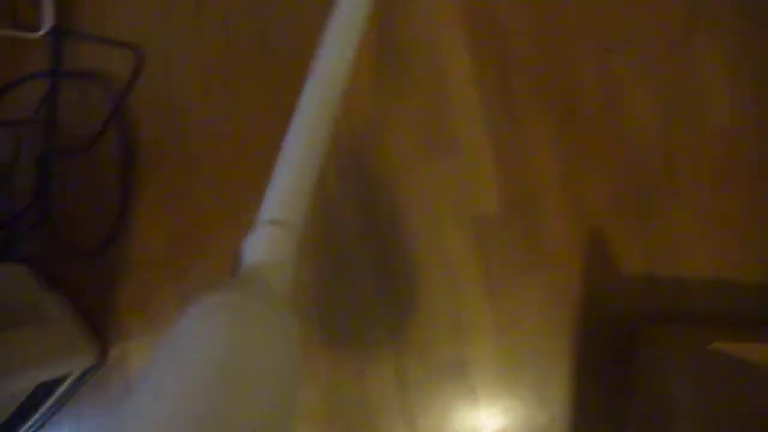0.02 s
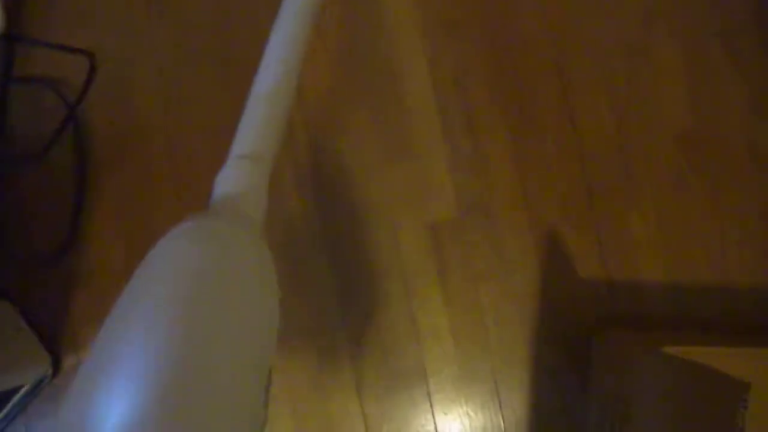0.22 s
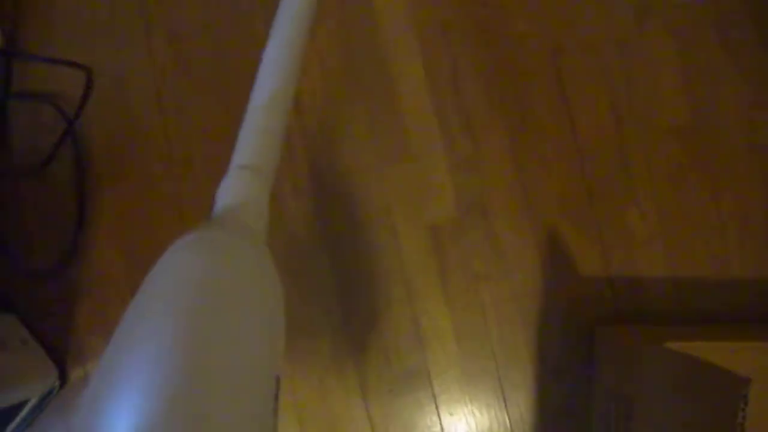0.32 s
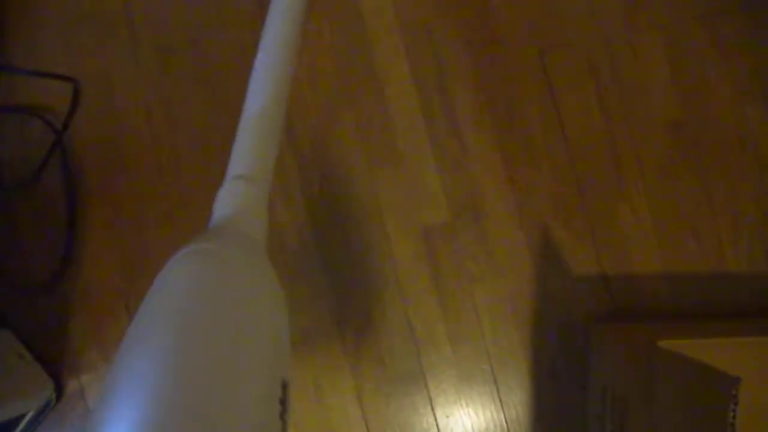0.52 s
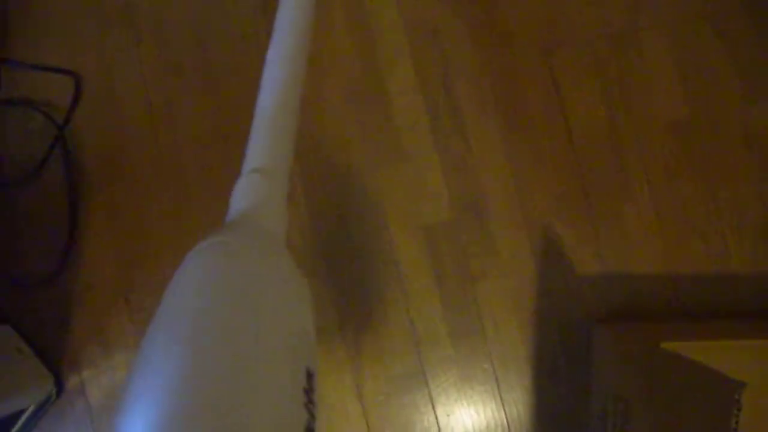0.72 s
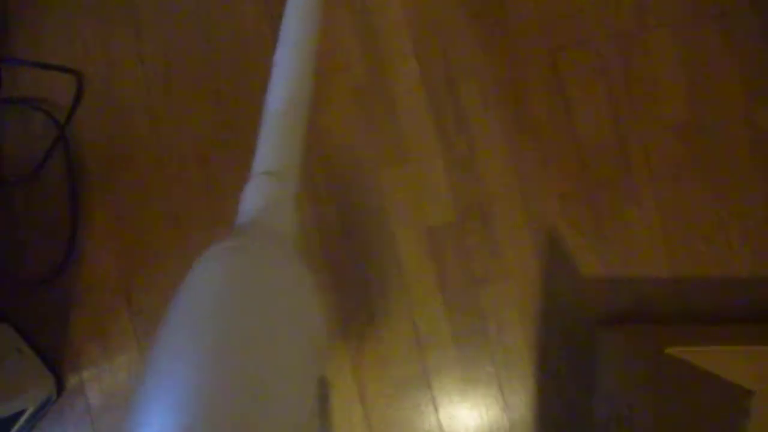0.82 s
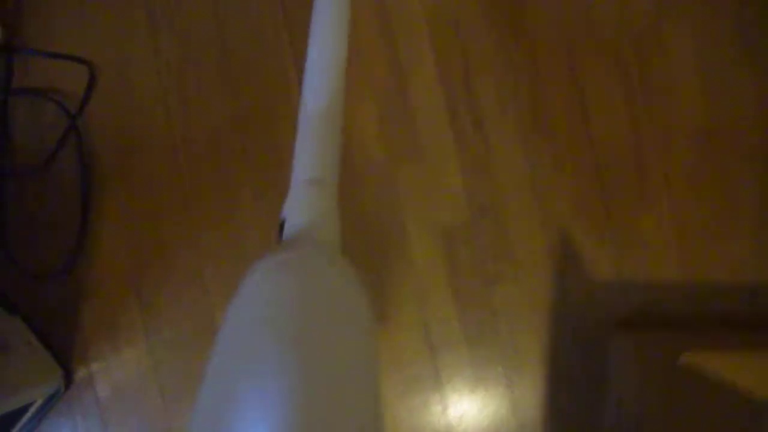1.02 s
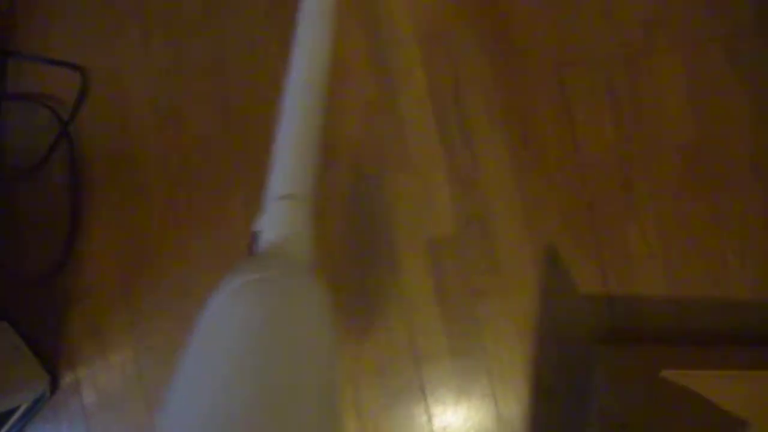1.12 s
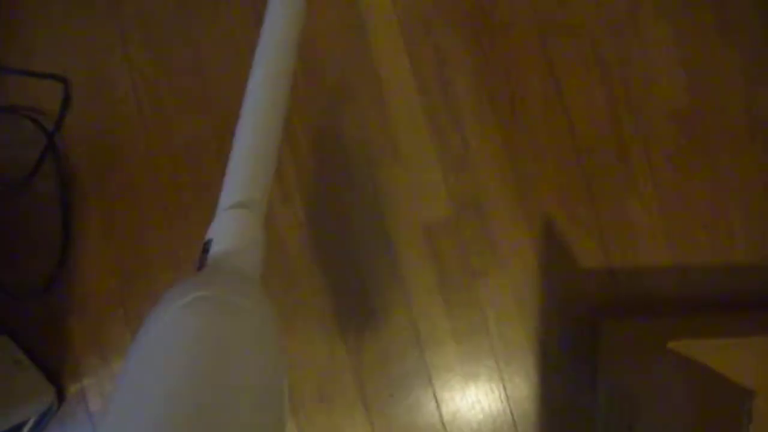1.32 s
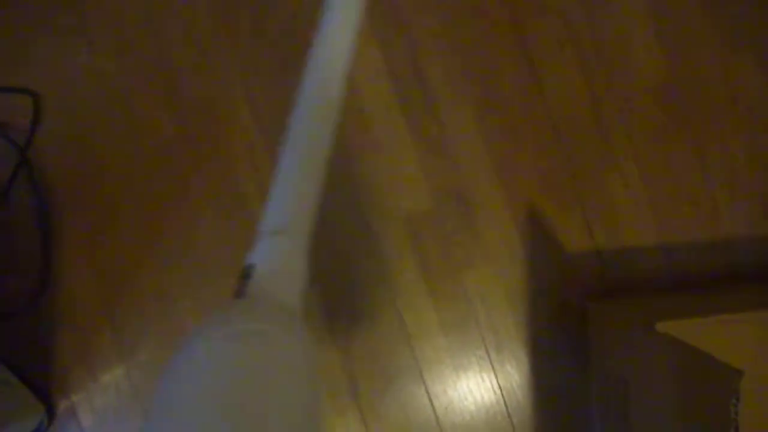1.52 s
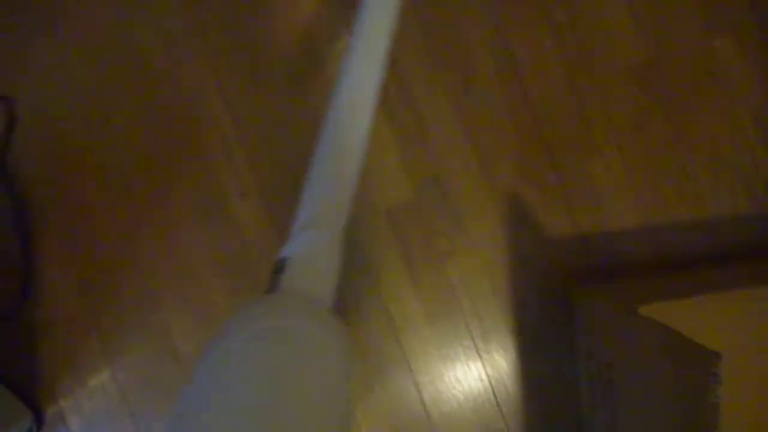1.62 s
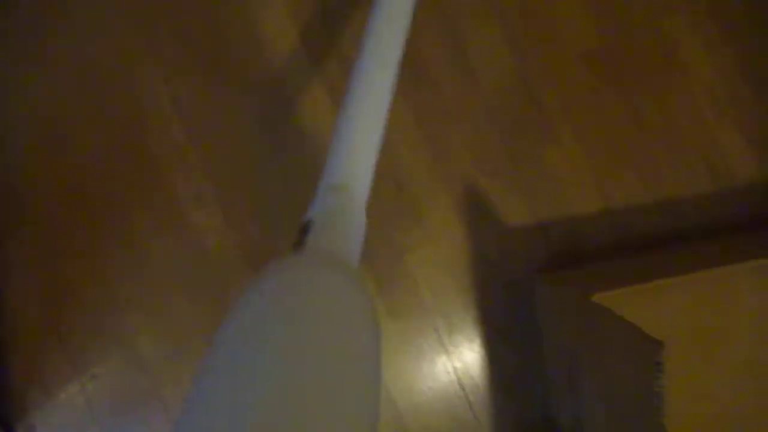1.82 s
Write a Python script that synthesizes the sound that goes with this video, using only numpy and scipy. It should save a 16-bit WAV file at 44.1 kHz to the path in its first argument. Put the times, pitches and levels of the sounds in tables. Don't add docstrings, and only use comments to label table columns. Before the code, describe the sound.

A handheld vacuum cleaner close to the microphone in a quiet furnished room: faint hiss, switch click and hollow plastic knock, under a second of whining, rushing air, then a falling whine with small ticks and bumps.

```python
import sys
import numpy as np
from scipy import signal
from scipy.fft import rfft, irfft
from scipy.io import wavfile

SR = 44100
rng = np.random.default_rng(int(sys.argv[2]) if len(sys.argv) > 2 else 0)


def ratio_of_db(decibels):
    return 10 ** (np.asarray(decibels, float) / 20)


def master(y):
    cut = np.clip(np.atleast_2d(y).T, -1, 1)
    pcm = np.round(cut * 32767)
    wavfile.write(sys.argv[1], SR, pcm.astype(np.int16))


N = 83790


def t():
    return np.arange(N) / SR


def rms_one(x):
    return x / np.sqrt(np.mean(x ** 2) + 1e-20)


def in_time(rows):
    s, *columns = np.transpose(rows)
    return [np.interp(t(), s, column) for column in columns]


def drift(rate_hz):
    r = np.exp(-80 * np.pi * rate_hz / SR)
    warm_up = 2000
    steps = rng.standard_normal(N // 40 + 2 + warm_up)
    slow = signal.lfilter([1], [1, -2 * r, r * r], steps)[warm_up:]
    return np.interp(np.arange(N) / 40, np.arange(len(slow)), rms_one(slow - slow.mean()))


def resonance(x, hz, width_hz):
    r = np.exp(-np.pi * width_hz / SR)
    poles = [1, -2 * r * np.cos(2 * np.pi * hz / SR), r * r]
    return signal.lfilter([(1 - r * r) / 2, 0, (r * r - 1) / 2], poles, x)


def bell(x, hz, width_hz, db):
    return x + (ratio_of_db(db) - 1) * resonance(x, hz, width_hz)


def butter(x, order, hz, kind):
    return signal.sosfilt(signal.butter(order, hz, kind, fs=SR, output="sos"), x)


def coloured(spectrum, patchy_db):
    log_hz = np.log(np.maximum(np.arange(N // 2 + 1) * SR / N, 1))
    f, db = np.transpose(spectrum)
    log_f = np.log(f)
    colour_db = np.interp(log_hz, log_f, db)
    colour_db -= 30 * np.maximum(log_f[0] - log_hz, 0)
    colour_db -= 20 * np.maximum(log_hz - log_f[-1], 0)
    shaped = rfft(rng.standard_normal(N)) * ratio_of_db(colour_db)
    together = drift(4.7)
    out = 0
    for centre in np.arange(3.3, 10.2, .35):
        share = np.maximum(1 - np.abs(log_hz - centre) / .35, 0)
        flicker_db = patchy_db * (0.52 * together + drift(20))
        out = out + irfft(shaped * share, N) * ratio_of_db(flicker_db)
    return rms_one(out)


# (f/Hz, level/dB per Hz)
ROOM_TONE = [(40, -13), (150, -12.5), (496, -2.5), (2460, -7), (2750, -11.5), (5500, -8), (9500, -14),
             (15800, -26)]


def room_tone():
    hiss = coloured(ROOM_TONE, patchy_db=1.5)
    return ratio_of_db(-45.5) * bell(hiss, hz=6350, width_hz=300, db=10.6)


# (t/s, level/dB, length/s, f/Hz)
TICKS = [
    (.112, -44.5, 0.0073, 8600),
    (.2042, -30, .002, 5000),
    (.2185, -33, .002, 3000),
    (0.2197, -24, 0.0088, 5680),
    (.226, -30, 0.0085, 1950),
    (1.272, -33, 0.0091, 5100),
    (1.518, -34.5, 0.007, 5700),
    (1.742, -36, 0.0057, 4850),
    (1.785, -38, 0.017, 5900),
]
TICK_WIDTH, TICK_BROAD_DB, TICK_T60_S = 0.44, -3.5, 0.048


def ticks():
    noise = rng.standard_normal(N)
    broad = rms_one(butter(noise, 2, (1520, 6900), "band"))
    out = 0
    for s, db, length, hz in TICKS:
        age = t() - s
        attack = np.clip(age * 2000, 0, 1)
        fade = ratio_of_db(-60 * np.maximum(age - length, 0) / TICK_T60_S)
        width_hz = TICK_WIDTH * hz
        tone = rms_one(resonance(resonance(noise, hz, width_hz), hz, width_hz))
        out = out + ratio_of_db(db) * attack * fade * (tone + ratio_of_db(TICK_BROAD_DB) * broad)
    return out


# (t/s, level/dB, f/Hz, t60/s)
BUMPS = [
    (.221, -32, 903, 0.11),
    (.221, -30, 695, 0.15),
    (.223, -25.5, 406, 0.11),
    (.24, -29.5, 200, 0.058),
    (1.516, -22, 400, .04),
    (1.526, -38, 230, .25),
    (1.513, -36, 780, .13),
    (1.526, -37, 500, .2),
    (1.79, -40.5, 773, 0.2),
    (1.8, -39.5, 246, 0.23),
]
BUMP_RISE_S, BUMP_SPREAD, BUMP_NOISE = .004, 1.5, .7


def bumps():
    noise = rng.standard_normal(N)
    out = 0
    for s, db, hz, t60 in BUMPS:
        age = np.maximum(t() - s, 0)
        puff = rms_one(butter(noise, 2, [hz / BUMP_SPREAD, hz * BUMP_SPREAD], "band"))
        body = np.sin(2 * np.pi * hz * age) + BUMP_NOISE * puff
        out = out + ratio_of_db(db - 60 * age / t60) * np.clip(age / BUMP_RISE_S, 0, 1) * body
    return out


ON_S, OFF_S = .222, .982
TOP_HZ, LACK_HZ, SPIN_UP_S = 280.7, 149.74, .125
DRAG_PER_S, DRAG_EASE = .98, 1.07


def shaft_hz():
    powered_s = np.clip(t(), ON_S, OFF_S) - ON_S
    powered_hz = TOP_HZ - LACK_HZ * np.exp(-powered_s / SPIN_UP_S)
    coasting_s = np.maximum(t() - OFF_S, 0)
    return powered_hz / (1 + DRAG_PER_S * coasting_s ** DRAG_EASE)


# (t/s, rush level/dB, duct air level/dB, blade whine level/dB, shaft hum level/dB)
FAN = [(.24, -34, -38, -68, -50.5), (.355, -28, -40, -48, -51), (.378, -25.5, -37, -32.5, -65),
       (.42, -27.5, -34, -43.5, -52), (.48, -24, -33.5, -28.5, -52), (.52, -24.5, -34, -34.5, -41.5),
       (.59, -24, -33, -23.5, -46), (.7, -23, -33, -36, -44), (.8, -23, -32, -40, -46),
       (.93, -22.5, -34, -33.5, -45.5), (1.0, -22.5, -32, -34, -47), (1.075, -25.5, -34, -26.5, -48),
       (1.17, -27.5, -38, -44.5, -48.5), (1.21, -33, -35.5, -43, -47.5), (1.4, -36, -37.5, -57, -52.5),
       (1.5, -37.5, -40.5, -60, -51), (1.7, -41, -44.5, -52, -55.5), (1.9, -47, -49, -52, -69)]
# (multiple of shaft speed, level/dB against the shaft hum)
SHAFT_ORDERS = [(2, -2), (3, -6), (4, -8)]
# (multiple of shaft speed, level/dB, loudest t/s, lasts/s)
WHISTLES = [
    (18, -55, 1.3, .1),
    (27, -43, 1.43, .045),
    (27, -44, 1.565, .03),
    (27, -50, 1.67, .06),
    (36, -53, 1.55, .15),
    (54, -58, 1.46, .06),
    (58, -61, 1.55, .12),
    (63, -62, 1.43, .05),
    (66, -61, 1.85, .06),
]
# (f/Hz, level/dB per Hz)
RUSH = [(880, -54), (1500, -20), (2360, -10.5), (2480, -18), (2680, -14), (3600, -4), (5960, 0),
        (14500, -22.5), (15800, -28)]
# (f/Hz, level/dB per Hz)
DUCT = [(120, -53), (200, -1.5), (272, -4), (842, -2.5), (966, -2), (1080, -5), (1350, -1.5), (2500, 1),
        (3250, -8), (5500, -120)]
# (f/Hz, width/Hz, gain/dB)
HOUSING = [(475, 20, 9), (1096, 70, 7.5), (1540, 27, 6), (2050, 31, 3), (4020, 67, 4), (4800, 130, -0.5),
           (5900, 154, 4), (6270, 310, 3), (6940, 390, 2)]
BLADES, WOBBLE_HZ, FLUTTER_DB = 9, .4, 1.5
DULL_HZ, DULL_PER_DB = 9700, .3


def fan():
    rush_db, duct_db, blade_db, hum_db = in_time(FAN)
    turn = 2 * np.pi * np.cumsum(shaft_hz() + WOBBLE_HZ * drift(16.5)) / SR
    whine = ratio_of_db(blade_db + FLUTTER_DB * drift(29)) * np.sin(BLADES * turn)
    for multiple, db, s, lasts in WHISTLES:
        swell = np.exp(-((t() - s) / lasts) ** 2)
        whine += ratio_of_db(db + FLUTTER_DB * drift(20)) * swell * np.sin(multiple * turn)
    hum = 0
    for multiple, db in [(1, 0), *SHAFT_ORDERS]:
        hum = hum + ratio_of_db(hum_db + db + FLUTTER_DB * drift(15)) * np.sin(multiple * turn)
    rush = coloured(RUSH, patchy_db=0.84)
    dull = signal.sosfiltfilt(signal.butter(2, DULL_HZ, fs=SR, output="sos"), rush)
    rush = dull + (rush - dull) * ratio_of_db(DULL_PER_DB * (rush_db - rush_db.max()))
    duct = coloured(DUCT, patchy_db=0.97)
    air = ratio_of_db(rush_db) * rush + ratio_of_db(duct_db) * duct + np.sqrt(2) * hum
    for hz, width_hz, gain_db in HOUSING:
        air = bell(air, hz, width_hz, gain_db)
    return (np.sqrt(2) * whine + air) * np.clip((t() - ON_S) / 0.01, 0, 1)


# (t/s, hum level/dB, rumble level/dB)
WAND = [(.25, -60, -57), (.6, -57, -72.5), (.95, -56, -66), (1.05, -45, -79), (1.2, -59, -89),
        (1.38, -43.5, -56), (1.55, -39, -53), (1.67, -45.5, -58), (1.73, -50, -49), (1.9, -44, -62)]
# (f/Hz, width/Hz, level/dB)
PIPE = [(228, 25, -7), (463, 25, -13), (549, 7, 0), (780, 25, -10)]


def wand():
    hum_db, rumble_db = in_time(WAND)
    pipe_noise, board_noise = rng.standard_normal((2, N))
    hum = 0
    for hz, width_hz, db in PIPE:
        tone = rms_one(resonance(resonance(pipe_noise, hz, width_hz), hz, 2 * width_hz))
        hum = hum + ratio_of_db(db + 4.2 * drift(2.6)) * tone
    rumble = rms_one(butter(board_noise, 3, (103, 200), "band"))
    return (ratio_of_db(hum_db) * hum + ratio_of_db(rumble_db + 2.3 * drift(36)) * rumble) * (t() > ON_S)


ROOM_DB, ROOM_T60_S, FIRST_ECHO_S, ROOM_LOW_HZ = -9, .25, .004, 700


def room(x):
    age = t()[:SR // 2]
    echoes = rng.standard_normal(len(age)) * ratio_of_db(-60 * age / ROOM_T60_S) * (age > FIRST_ECHO_S)
    echoes = butter(echoes, 2, ROOM_LOW_HZ, "high")
    echoes = echoes / np.sqrt(np.sum(echoes ** 2))
    return x + ratio_of_db(ROOM_DB) * signal.fftconvolve(x, echoes)[:N]


def scene():
    background = room_tone()
    cleaner = ticks() + bumps() + fan() + wand()
    return np.tile(ratio_of_db(-0.57) * room(cleaner) + background, (2, 1))


def band_limit(x):
    return signal.sosfilt(signal.butter(12, 16370, fs=SR, output="sos"), x)


def record(dry):
    dipped = bell(dry, hz=7700, width_hz=280, db=-18)
    top_cut = signal.ellip(12, .5, 80, 15720, fs=SR, output="sos")
    mix = signal.sosfilt(top_cut, dipped)
    return band_limit(mix)


dry = scene()
out = record(dry)
master(out)
```